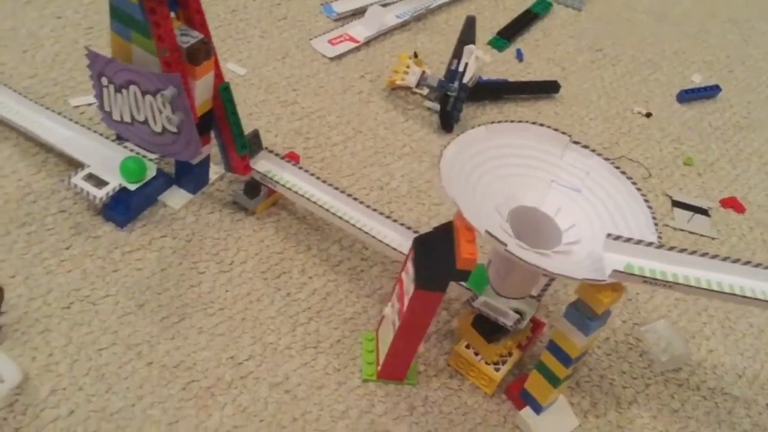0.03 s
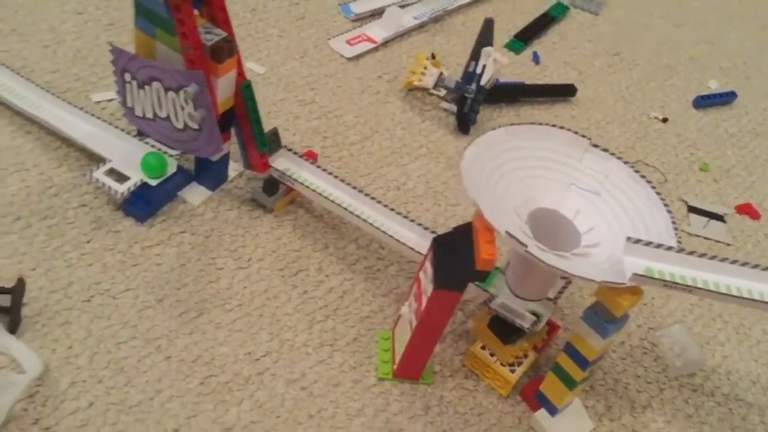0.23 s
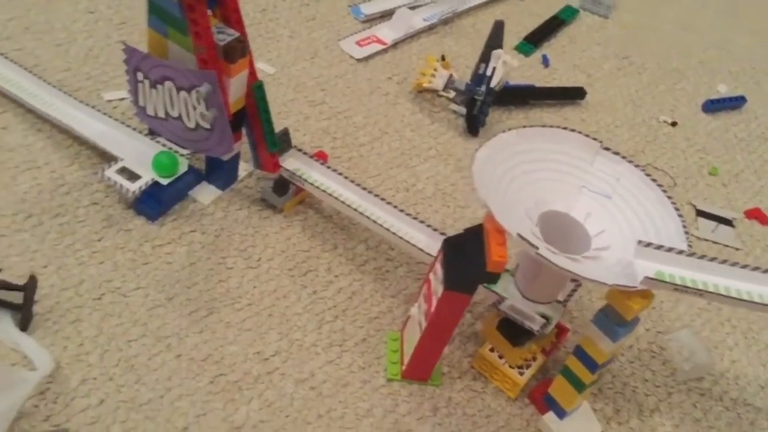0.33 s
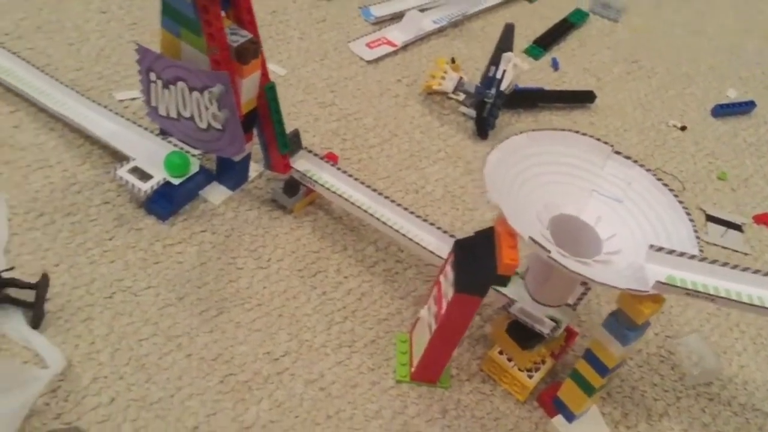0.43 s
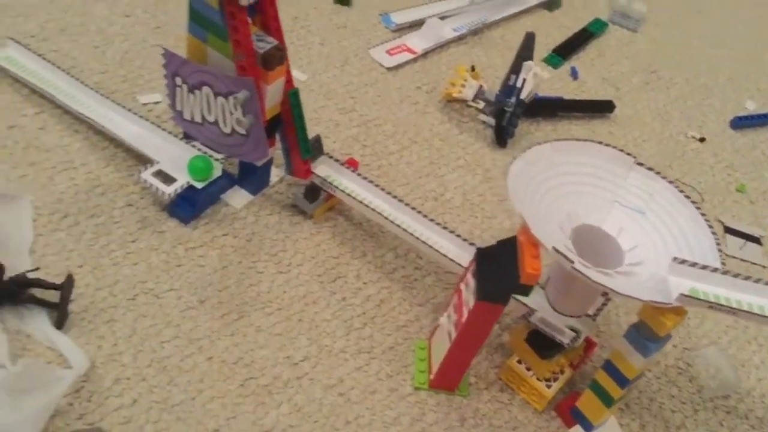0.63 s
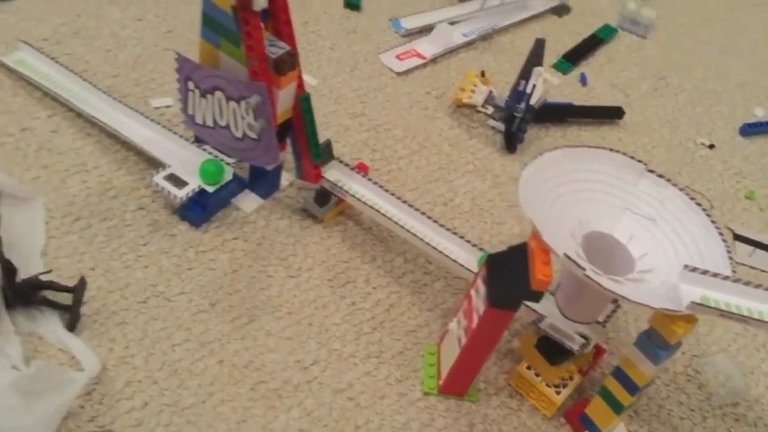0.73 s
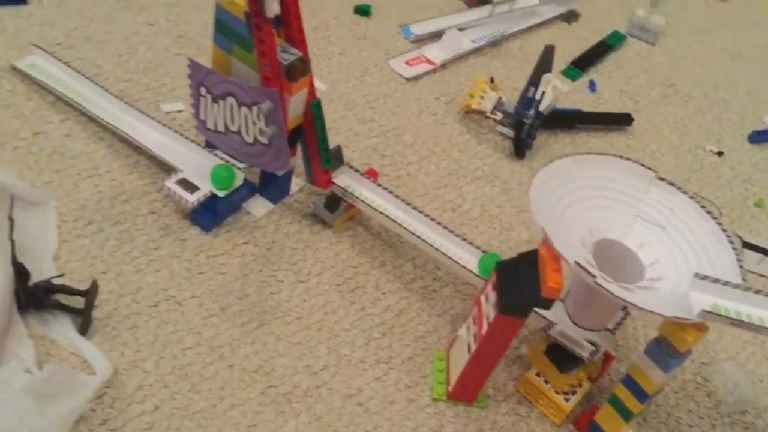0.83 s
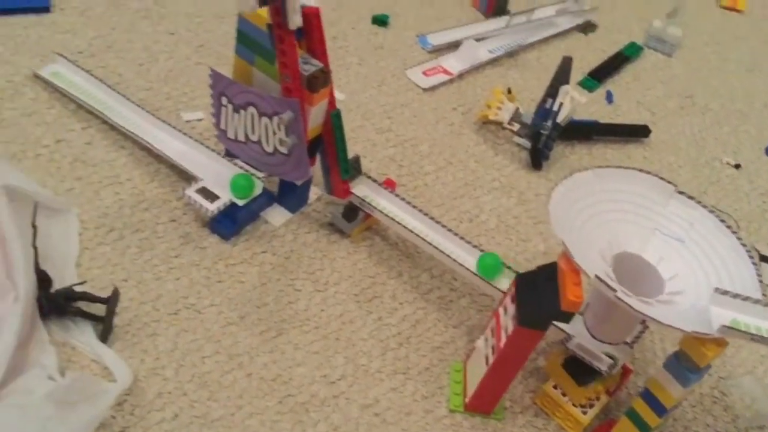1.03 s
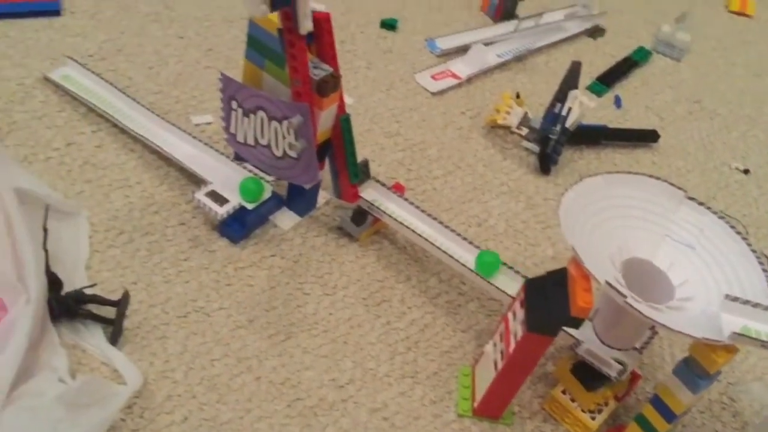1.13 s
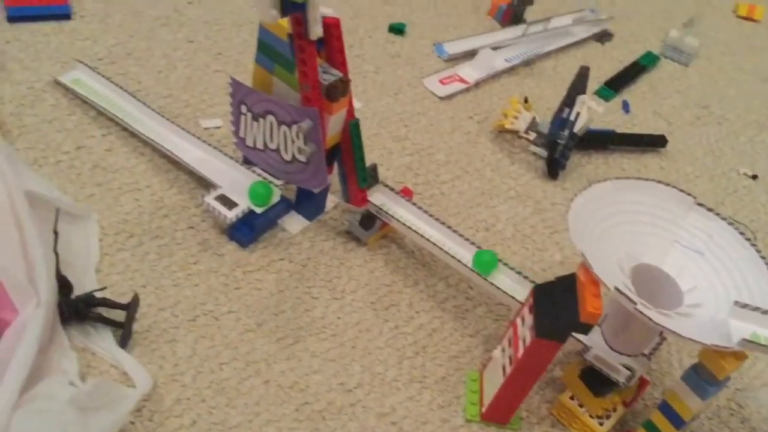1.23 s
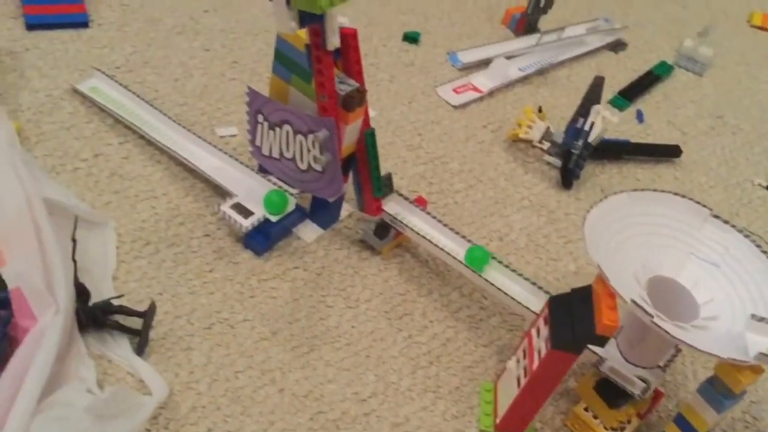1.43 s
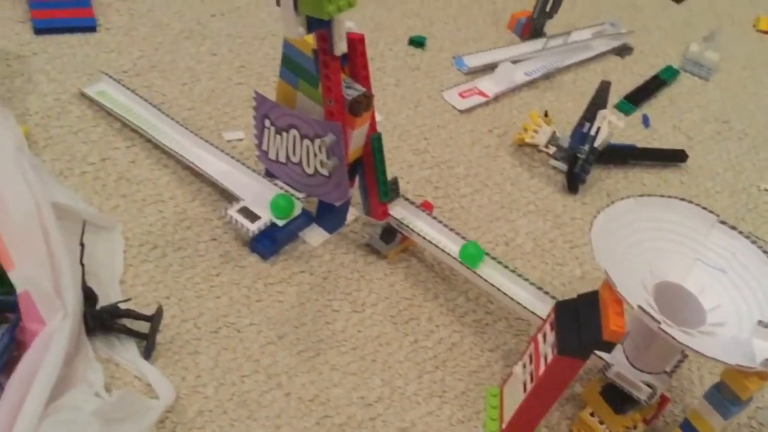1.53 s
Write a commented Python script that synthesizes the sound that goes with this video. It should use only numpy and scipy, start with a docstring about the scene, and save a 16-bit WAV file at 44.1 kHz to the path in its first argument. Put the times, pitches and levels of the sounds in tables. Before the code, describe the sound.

A small hard ball rattles in a toy funnel, then rolls softly down a plastic track.

```python
"""A small hard ball rattles in a toy funnel, ever harder, then drops out and rolls down a plastic track.
Every contact is a dry tick over a hollow patter and restarts a bright ring; near the outlet the ticks
gain a short plastic resonance. The ball lands with a sharp click and rolls on softly, with two faint taps.
A small carpeted room answers briefly, over a faint rumble and a wavering hum."""
import sys
import numpy as np
from scipy import signal
from scipy.fft import rfft, irfft, next_fast_len
from scipy.io import wavfile
from scipy.ndimage import map_coordinates

SR = 44100
rng = np.random.default_rng(int(sys.argv[2]) if len(sys.argv) > 2 else 0)


def int16_out(signal):
    """Quantize to a 16-bit WAV file."""
    q = np.round(np.clip(np.atleast_2d(signal).T, -1, 1) * 32767)
    wavfile.write(sys.argv[1], SR, q.astype(np.int16))


N = 70560

# the ball's hits on the funnel (t/s, relative tick level/dB, relative level of the main ring/dB)
HITS = [(0.001, -51.5, -52.5), (0.0432, -57.5, -85), (0.0506, -58, -64), (0.0789, -61, -71),
        (0.086, -59.5, -56), (0.0901, -43.5, -51.5), (0.094, -43, -48), (0.0976, -46, -53),
        (0.1035, -46.5, -69), (0.1095, -51.5, -50), (0.12, -52, -59), (0.125, -51, -70),
        (0.1372, -48, -55.5), (0.1485, -49, -77), (0.1584, -51, -50), (0.1697, -51, -53),
        (0.1794, -48.5, -47), (0.197, -43.5, -45), (0.2084, -43, -47), (0.214, -46, -56.5),
        (0.2235, -52.5, -46.5), (0.2352, -48, -41), (0.2438, -40.5, -51), (0.254, -40.5, -47),
        (0.2628, -46.5, -42.5), (0.298, -50.5, -45.5), (0.31, -43, -45), (0.3189, -46.5, -42),
        (0.3238, -40.5, -39.5), (0.3286, -47.5, -44), (0.347, -48, -60), (0.3564, -41.5, -44),
        (0.371, -38, -40), (0.3785, -37, -40), (0.3977, -41, -43), (0.4041, -46, -40.5),
        (0.4131, -41, -36.5), (0.4388, -45, -40), (0.4472, -36, -43), (0.4601, -36.5, -37),
        (0.4631, -49, -46), (0.4667, -54, -39), (0.4729, -36.5, -39), (0.481, -44, -36.5),
        (0.4934, -40.5, -37), (0.4983, -43, -40), (0.508, -50, -48.5), (0.5155, -47, -53),
        (0.525, -43, -46), (0.5366, -41, -43.5), (0.5452, -29.5, -41), (0.5501, -38.5, -33),
        (0.554, -44.5, -42.5), (0.5568, -34.5, -35), (0.5789, -42.5, -63), (0.589, -44.5, -42),
        (0.6167, -49.5, -44.5), (0.6245, -39, -41), (0.6295, -38.5, -36.5), (0.6341, -38, -38.5),
        (0.6397, -38, -47.5), (0.6433, -42, -46.5), (0.6496, -38.5, -38.5), (0.6576, -37.5, -41.5),
        (0.663, -40.5, -42), (0.6784, -42.5, -46.5), (0.6943, -32.5, -40), (0.7016, -39, -35),
        (0.708, -34, -39.5), (0.7131, -38.5, -35.5), (0.7203, -31.5, -43), (0.726, -44, -38),
        (0.7436, -39, -38), (0.7491, -38, -36.5), (0.7556, -42, -33.5), (0.764, -32.5, -29),
        (0.7806, -42, -40), (0.7915, -35.5, -43.5), (0.8051, -28.5, -35), (0.815, -28, -31),
        (0.8218, -31, -28.5), (0.827, -35.5, -35), (0.8302, -35, -32), (0.8407, -29.5, -35),
        (0.8578, -34.5, -33), (0.8656, -37, -26), (0.8827, -30.5, -28), (0.8866, -29.5, -36),
        (0.8923, -38, -35.5), (0.9006, -33.5, -29), (0.9157, -47, -30), (0.9184, -33, -30.5),
        (0.9231, -34, -33.5), (0.9306, -32.5, -32), (0.9371, -36, -33.5), (0.9529, -27, -34.5),
        (0.9643, -28, -29.5), (0.9784, -46.5, -46), (0.9894, -37.5, -35.5), (0.9936, -43, -39.5),
        (0.9985, -33, -27), (1.0151, -37.5, -39), (1.0209, -40, -39), (1.0356, -39, -43),
        (1.0392, -48.5, -49), (1.0489, -39.5, -59.5), (1.0597, -56.5, -39), (1.069, -49, -41.5),
        (1.0803, -56, -55.5), (1.0932, -54.5, -49.5), (1.0959, -54, -55.5), (1.1116, -60.5, -66.5)]


def amp(db):
    """Decibels to gain."""
    return 10 ** (np.asarray(db) / 20)


def unit(x):
    """Scaled to rms 1."""
    return x / np.sqrt(np.mean(x ** 2) + 1e-20)


def along(points, hz):
    """(f/Hz, value) points, read at hz on a log axis."""
    f, v = np.transpose(points)
    return np.interp(np.log(hz + 1), np.log(f + 1), v)


def curve(points):
    """An envelope through (t/s, value) points, one value per sample."""
    return np.interp(np.arange(N) / SR, *np.transpose(points))


def wobble(per_s):
    """A smooth random curve with per_s knots a second."""
    knots = rng.standard_normal(int(N * per_s / SR) + 4)
    return map_coordinates(knots, [np.arange(N) * per_s / SR])


def coloured(x, points):
    """x through a minimum-phase EQ of (f/Hz, level/dB) points, so attacks stay sharp."""
    m = 2 * next_fast_len(N)
    gain = amp(along(points, np.fft.rfftfreq(m, 1 / SR)))
    cepstrum = irfft(np.log(gain), m)
    cepstrum[1:m // 2] *= 2
    cepstrum[m // 2 + 1:] = 0
    return irfft(rfft(x, m) * np.exp(rfft(cepstrum)), m)[..., :N]


def pulses(times, sizes):
    """One impulse at each time."""
    return np.bincount(np.clip(np.round(times * SR).astype(int), 0, N - 1), sizes, N)


def background():
    """Room tone: a faint rumble and a low hum that wavers in pitch and level."""
    rumble_eq = [(20, -0.5), (35, -1.5), (60, -7), (130, -13.5), (250, -15.5), (500, -24.5), (1450, -29.5),
                 (2200, -27.5), (3400, -36.5), (3900, -56), (15000, -55.5)]  # colour of the rumble (f/Hz, level/dB)
    hum_fader = [(0.0, -74), (0.098, -67), (0.386, -78), (0.454, -65.5), (0.574, -86.5), (0.992, -79),
                 (1.024, -67), (1.216, -70), (1.256, -82), (1.332, -66), (1.536, -67.5), (1.6, -74)]  # swells and dips of the hum (t/s, relative level/dB)
    hum_hz = 95.8 + 3.7 * wobble(per_s=12)
    phase = 2 * np.pi * np.cumsum(hum_hz) / SR
    hum = amp(curve(hum_fader) - 0.5) * np.sqrt(2) * np.sin(phase)
    rumble = amp(-68) * unit(coloured(rng.standard_normal(N), rumble_eq))
    return hum + rumble


def room(x):
    """The carpeted room's short diffuse tail; each frequency dies at its own speed."""
    decay_times = [(300, 0.47), (5000, 0.11), (9000, 0.1), (15000, .22)]  # reverb time (f/Hz, t60/s)
    hz, t, noise = signal.stft(rng.standard_normal(SR // 2), SR, nperseg=256)
    decay = np.exp(-np.log(1000) * t / along(decay_times, hz)[:, None])
    tail = signal.istft(noise * decay, SR, nperseg=256)[1]
    return signal.fftconvolve(x, tail / np.linalg.norm(tail))[:N]


def early_reflections(x):
    """Twelve quick echoes off the track and the toys around it."""
    delays_s = 0.011 * rng.random(size=12)
    sizes = rng.standard_normal(size=12)
    return signal.fftconvolve(x, pulses(delays_s, sizes / np.linalg.norm(sizes)))[:N]


def rolling():
    """The low, uneven murmur of the ball on the plastic track."""
    roll_fader = [(0, -82), (.55, -82), (.7, -74), (.85, -74), (1.25, -72.5), (1.45, -73), (1.6, -76.5)]  # rise and fall of the murmur (t/s, level/dB)
    roll_eq = [(100, -11), (200, -0.5), (400, 1), (540, 1.5), (630, 2), (730, -4), (850, -11), (1200, -11),
               (1500, -24), (2200, -18), (3300, -28), (3900, -55.5)]  # its dull colour (f/Hz, level/dB)
    level_db = curve(roll_fader) + 2.5 * wobble(per_s=14)
    return amp(level_db) * unit(coloured(rng.standard_normal(N), roll_eq))


def taps():
    """Two faint bumps as the ball runs down the track."""
    bumps = [(1.231, -40.5), (1.475, -47.5)]  # knocks on the track (t/s, relative level/dB)
    tap_eq = [(200, -5), (700, 2), (1500, -3), (2400, 0), (3300, -10), (4000, -36)]  # their muted colour (f/Hz, level/dB)
    times, level_db = np.transpose(bumps)
    return coloured(pulses(times, amp(level_db)), tap_eq)


def landing(at_s=.9987):
    """One sharp click as the ball meets the track."""
    click_eq = [(200, -45), (5000, -28), (7000, -8), (11500, -12), (13000, -2.5), (15500, 0.5)]  # nearly all top end (f/Hz, level/dB)
    return coloured(pulses(np.array([at_s]), amp([-22])), click_eq)


def fine_rattle(per_s=520, scatter_db=4.5):
    """Tiny random contacts between the clear hits."""
    touches = rng.random(N) < per_s / SR
    signs = rng.choice([-1, 1], N)
    return touches * signs * amp(scatter_db * rng.standard_normal(N))


def funnel_body():
    """The hollow patter of the funnel wall, much the same for soft and hard hits."""
    wall_eq = [(150, -10.5), (600, -9), (760, -5), (890, 1.5), (1080, -9), (1550, 1), (2050, -4),
               (2650, 3.5), (3450, -3), (4200, -1.5), (5200, -17.5), (9000, -42)]  # resonances of the wall (f/Hz, level/dB)
    wall_fader = [(0, -71), (.07, -75.5), (.1, -69.5), (.25, -69), (.29, -73), (.36, -68), (.55, -71),
                  (.6, -72.5), (.66, -71.5), (.8, -71.5), (.96, -76.5), (1.02, -80), (1.12, -94.5),
                  (1.2, -115)]  # envelope of the patter (t/s, level/dB)
    times, tick_db, _ = np.transpose(HITS)
    compressed_db = 0.35 * (tick_db - tick_db.mean())
    force = pulses(times, amp(compressed_db)) + amp(-9) * fine_rattle()
    return amp(curve(wall_fader)) * unit(coloured(force, wall_eq))


def restruck_mode(times, level_db, hz, t60, kick_rad, detune_hz, attack_s=.00035):
    """A mode that each hit sets to a new level and knocks out of phase; it dies away in between."""
    t = np.arange(N) / SR
    last_hit = np.maximum(np.searchsorted(times, t, side="right") - 1, 0)
    knock, detune = rng.standard_normal((len(times), 2)).T
    phase = np.cumsum(kick_rad * knock)[last_hit]
    phase += 2 * np.pi * np.cumsum(detune_hz * detune[last_hit]) / SR
    decay = np.exp(-np.log(1000) * np.abs(t - times[last_hit]) / t60)
    swing = (t >= times[0]) * amp(level_db[last_hit]) * decay * np.exp(1j * phase)
    pole = np.exp(-2 / (attack_s * SR))
    swing = signal.lfilter([(1 - pole) ** 2], np.poly([pole, pole]), swing)  # rounds each restart
    return np.imag(swing * np.exp(2j * np.pi * hz * t))


def rings():
    """The bright main ring and three weaker, fluttering modes, all restarted by the hits."""
    weak_modes = [(5068, -62, 0.11), (5331, -56.5, .13), (11875, -53.5, 0.14)]  # overtones beside the main ring (f/Hz, level/dB, t60/s)
    knee_db, scatter_db = -43.5, 3.5
    times, tick_db, ring_db = np.transpose(sorted(map(tuple, HITS)))
    ring = restruck_mode(times, ring_db + .5, hz=9101, t60=.14, kick_rad=0.36, detune_hz=0)
    ring *= amp(0.85 * wobble(per_s=220))  # slight shimmer
    soft_hit_db = np.minimum(tick_db - knee_db, 0)  # below the knee, softer hits ring less
    for hz, mode_db, t60 in weak_modes:
        level_db = mode_db + soft_hit_db + scatter_db * rng.standard_normal(len(times))
        flutter = amp(3 * wobble(per_s=120))
        ring += flutter * restruck_mode(times, level_db, hz, t60, kick_rad=.7, detune_hz=24)
    return ring


def ticks():
    """The hard ball's dry hits and fine rattle; their colour crossfades from funnel to outlet."""
    rattle_fader = [(0, -66), (.07, -68), (.095, -56), (.29, -58.5), (.4, -49.5), (.55, -58.5), (.6, -56),
                    (.8, -54), (.95, -54), (1.03, -55), (1.08, -64), (1.13, -76.5), (1.2, -120)]  # envelope of the fine rattle (t/s, relative level/dB)
    inside_eq = [(200, -40), (2700, -25), (3500, -23.5), (4500, -8), (5600, -0.5), (8300, -0.5), (9800, -7),
                 (12500, -9), (15500, -23.5)]  # tick colour inside the funnel (f/Hz, level/dB)
    outlet_eq = [(200, -50), (2700, -33), (3600, -31), (4700, -16), (5700, -3), (6500, 0), (8300, -4.5),
                 (9800, -9), (12500, -21), (15500, -22.5)]  # narrower tick colour at the outlet (f/Hz, level/dB)
    track_modes = [(6450, -13.5, 0.0084), (6670, -9, 0.0087)]  # plastic resonance of the track as the ball comes out (f/Hz, relative level/dB, t60/s)
    exit_middle_s, exit_length_s = 0.75, 0.41
    times, tick_db, _ = np.transpose(HITS)
    t = np.arange(N) / SR
    force = pulses(times, amp(tick_db)) + fine_rattle() * amp(curve(rattle_fader))
    at_outlet = np.clip((t - exit_middle_s) / exit_length_s + .5, 0, 1)
    inside = amp(15.5) * coloured(force * (1 - at_outlet), inside_eq)
    outlet = amp(18.5) * coloured(force * at_outlet, outlet_eq)
    age = t[:SR // 20]
    ping = sum(amp(db) * np.exp(-np.log(1000) * age / t60) * np.cos(2 * np.pi * hz * age)
               for hz, db, t60 in track_modes)
    plastic = signal.fftconvolve(force * at_outlet ** 2, ping)[:N]
    return inside + outlet + plastic


def scene():
    """Ticks and rings in the room, nearly mono, over the rolling and the room tone."""
    send_eq = [(300, 1.5), (4000, -0.5), (6500, 1), (11000, -0.5), (12800, 4.5), (15500, 2)]  # colour of the ticks' reverb send (f/Hz, level/dB)
    notch_eq = [(9250, 0.5), (9600, -5), (10000, -28), (10800, -18), (11300, -3.5), (11700, 0.5)]  # dark gap between the two high rings (f/Hz, level/dB)
    bed_width = [(30, -32), (150, -36.5), (350, -30.5), (650, -23), (1400, -23), (3000, -27)]  # side over mid of rolling and room tone (f/Hz, level/dB)
    tick_send_db, ring_send_db = -8.5, -10
    tick_width, ring_width = 0.21, 0.25  # side over mid of the reverb
    tick = ticks() + funnel_body() + landing() + taps()
    ring = rings()
    tick_send = amp(tick_send_db) * coloured(tick, send_eq)
    ring_send = amp(ring_send_db) * ring
    ball = tick + ring + amp(-27) * early_reflections(tick) + room(tick_send + ring_send)
    mid = coloured(ball, notch_eq) + rolling() + background()
    side_tail = room(tick_width * tick_send + ring_width * ring_send)
    side = coloured(side_tail, notch_eq) + coloured(rolling() + background(), bed_width)
    return np.array([mid + side, mid - side])


def record(dry):
    """A brick-wall low-pass trims the very top."""
    top_hz = 15830
    m = 2 * next_fast_len(N)
    passband = np.fft.rfftfreq(m, 1 / SR) < top_hz
    return irfft(rfft(dry, m) * passband, m)[..., :N]


dry = scene()
out = record(dry)
int16_out(out)
```